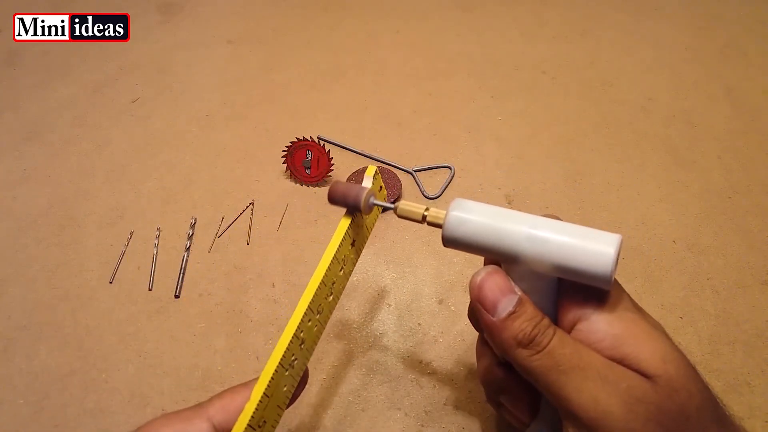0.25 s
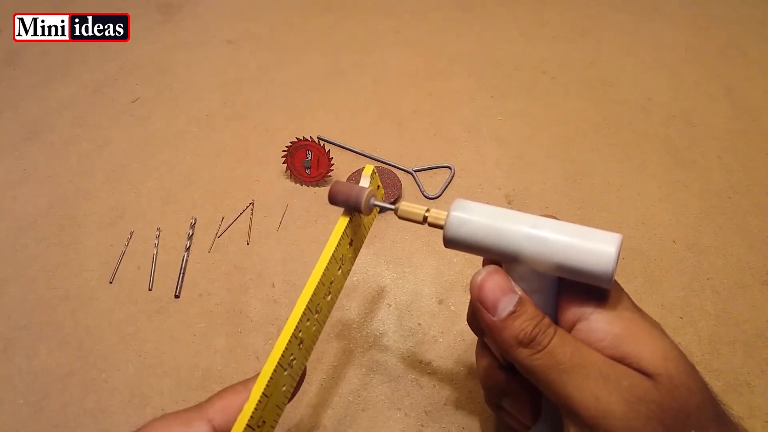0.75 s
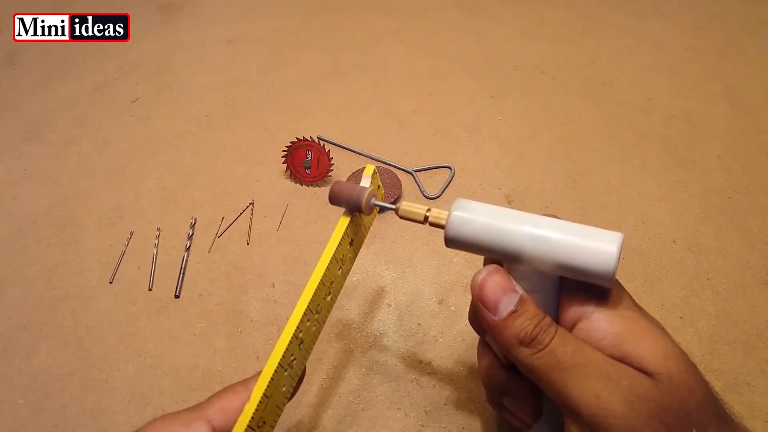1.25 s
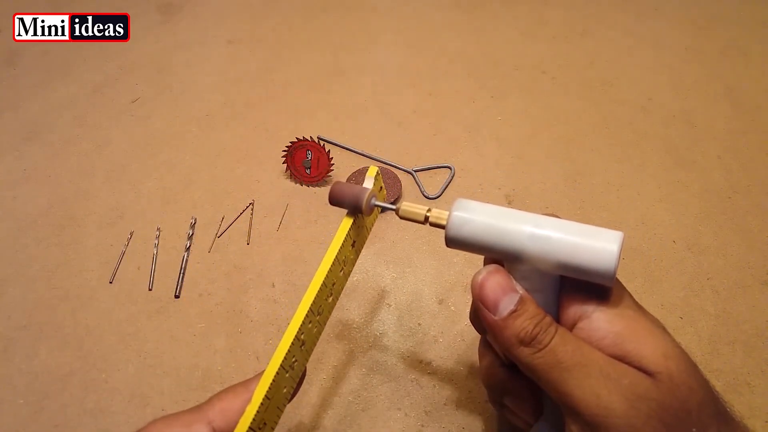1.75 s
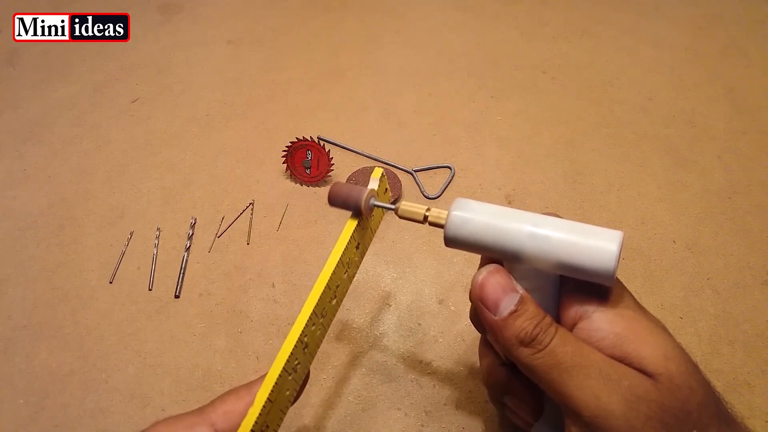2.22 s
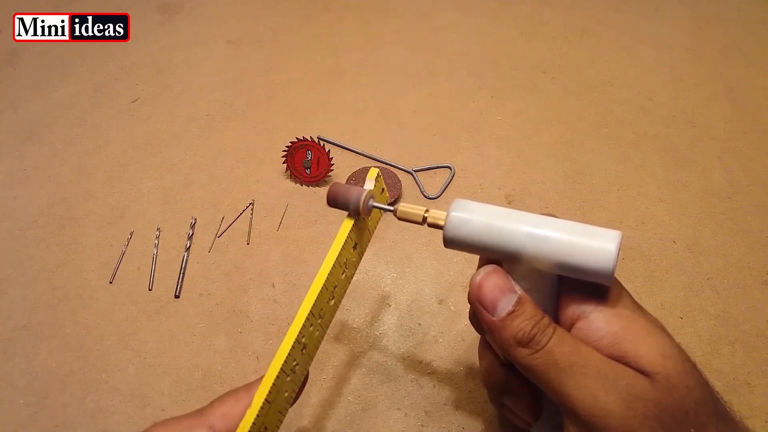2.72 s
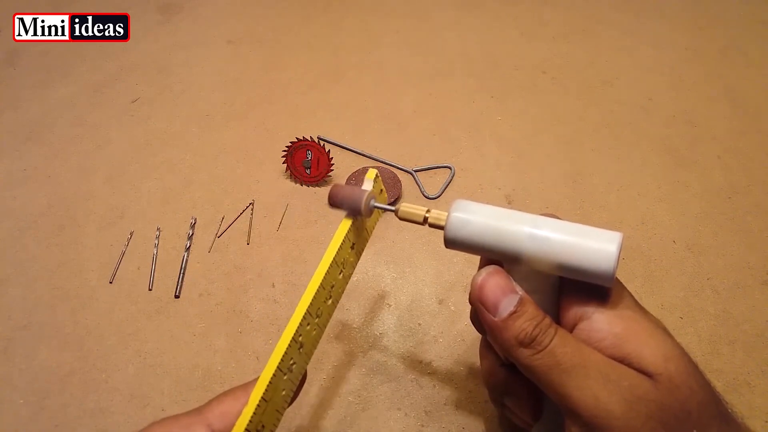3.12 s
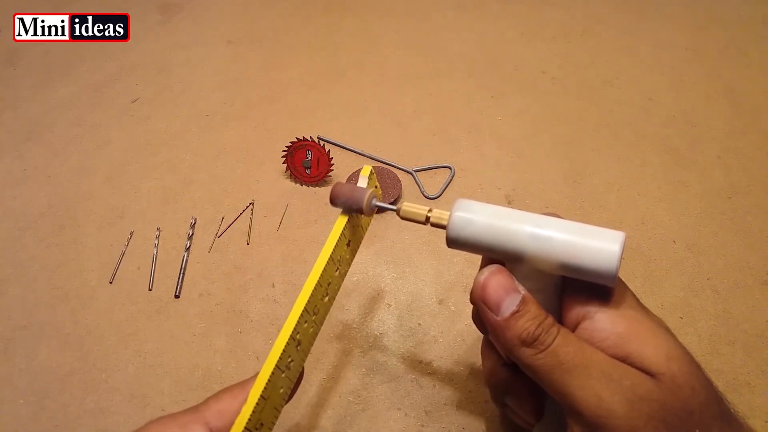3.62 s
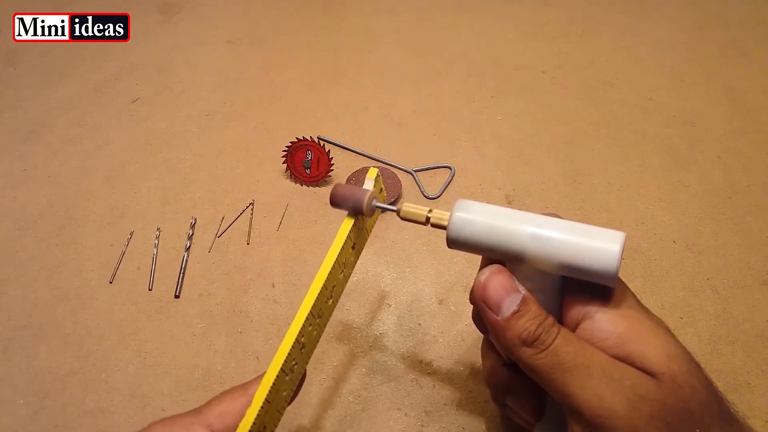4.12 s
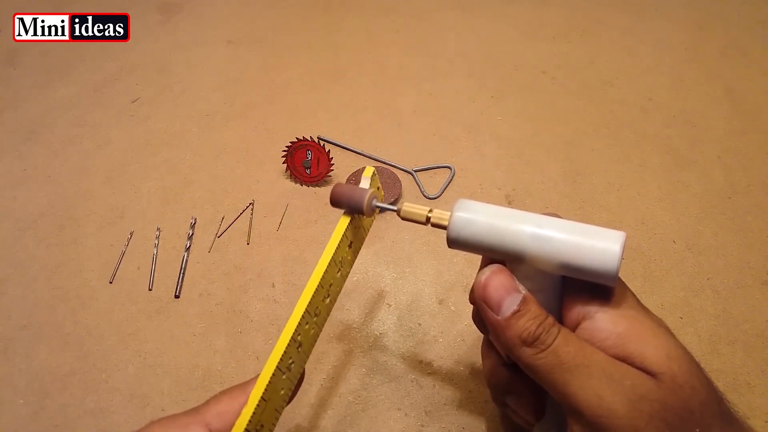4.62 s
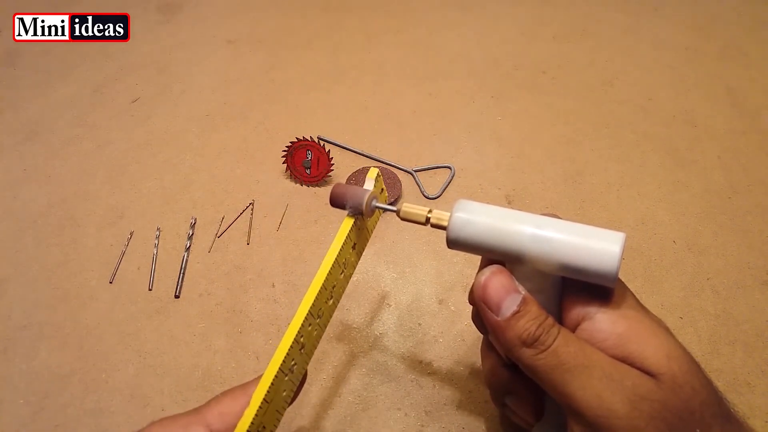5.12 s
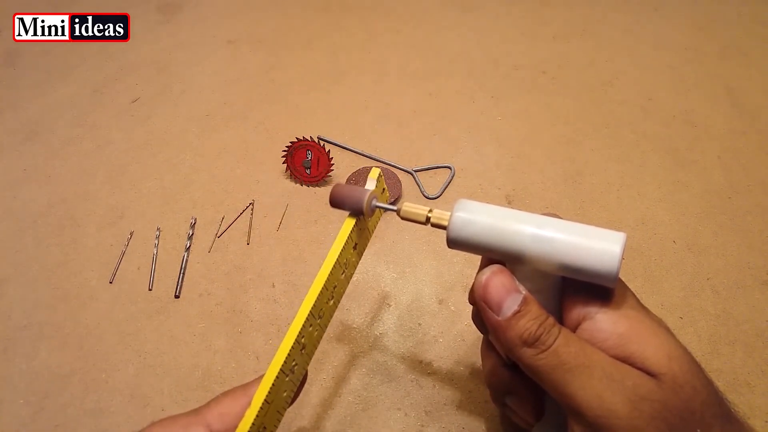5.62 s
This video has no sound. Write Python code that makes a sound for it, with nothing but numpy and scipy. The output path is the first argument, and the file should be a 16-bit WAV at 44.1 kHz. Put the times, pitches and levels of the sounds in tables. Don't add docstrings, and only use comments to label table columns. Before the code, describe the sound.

Close, buzzy sanding of a thin metal strip: a high whine sinks to a growl, recovers, stops for an instant, and grinds again.

```python
import sys
import numpy as np
from scipy import signal
from scipy.fft import rfft, irfft
from scipy.io import wavfile

SR = 44100
rng = np.random.default_rng(int(sys.argv[2]) if len(sys.argv) > 2 else 0)


def materialize(psi):
    bounded = np.clip(np.atleast_2d(psi).T, -1, 1)
    quanta = np.round(bounded * 32767).astype(np.int16)
    wavfile.write(sys.argv[1], SR, quanta)


def magnitude_from_level(level_db):
    exponent = np.asarray(level_db, float) / 20
    return 10 ** exponent


N = 258426

# frequency in Hz, bandwidth in Hz, level in dB.
GRIP = (142, 28, -45)
USUAL_PUSH_DB = -37.5
SLIP_S = .00005


def rms_one(x):
    return x / np.sqrt(np.mean(x ** 2) + 1e-20)


def in_time(rows):
    s, *columns = np.transpose(rows)
    return [np.interp(np.arange(N) / SR, s, c) for c in columns]


def resonate(x, modes, between_db):
    out = magnitude_from_level(between_db) * x
    for k, (hz, width_hz, db) in enumerate(modes):
        r = np.exp(-np.pi * width_hz / SR)
        b = (1 - r * r) / 2 * np.array([1, 0, -1])
        poles = [1, -2 * r * np.cos(2 * np.pi * hz / SR), r * r]
        out = out + (-1) ** k * magnitude_from_level(db) * signal.lfilter(b, poles, x)
    return out


def cut(x, hz, kind, order=2):
    return signal.sosfilt(signal.butter(order, hz, kind, fs=SR, output="sos"), x)


def grit(per_s, rough, touch_db, slip_s, count, echo=0, seam=0):
    turns = np.cumsum(per_s) / SR
    whole = np.arange(int(turns[-1]))
    angle = (np.arange(count) + rng.random(count)) / (2 * count)
    angle = np.concatenate([angle, angle + .5])
    wear, fresh, slip = rng.standard_normal((3, len(whole), 2 * count))
    share = np.clip(np.interp(whole, turns, rough), 0, 1)[:, None]
    renew = .24 + .8 * share ** 1.5
    pattern = wear.copy()
    for k in whole[1:]:
        pattern[k] = np.sqrt(1 - renew[k] ** 2) * pattern[k - 1] + renew[k] * wear[k]
    pattern[:, :1] += seam * (1 - share) * magnitude_from_level(2 * fresh[:, 1:2])
    bite = np.sqrt(1 - share ** 2) * pattern + share * fresh
    bite[:, count:] = np.sqrt(1 - echo ** 2) * bite[:, count:] - echo * bite[:, :count]
    bite = bite * magnitude_from_level(touch_db * np.cos(2 * np.pi * angle))
    bite = bite / np.sqrt(np.mean(bite ** 2, axis=1, keepdims=True))
    at = np.interp(whole[:, None] + angle, turns, np.arange(N))
    slip = slip_s * SR * (.08 + 1.3 * share) * slip
    at = np.clip(at + slip, 0, N - 1)
    fine = 4
    clicks = np.bincount((at * fine).astype(int).ravel(), bite.ravel(), N * fine)
    return rms_one(signal.resample_poly(clicks, 1, fine) / np.sqrt(per_s))


def roughness():
    # start in seconds, end in seconds, roughness from 0 to 1.
    skip_rows = [(0, .36, .9), (.4, .54, .55), (.56, .63, .45), (.75, .75, .6), (.8, 1.35, .2),
                 (3.62, 4.03, .27), (4.3, 4.56, .22), (.89, .89, .6), (1.53, 1.54, .5), (1.645, 1.665, .6),
                 (1.71, 1.71, .5), (1.83, 1.89, .55), (1.89, 2.06, .75), (2.06, 2.27, .9), (2.3, 2.31, .5),
                 (2.44, 2.45, .7), (2.5, 2.62, .5), (2.67, 3.19, .9), (3.26, 3.32, .43), (3.36, 3.41, .78),
                 (3.58, 3.58, .6), (3.72, 3.77, .47), (3.91, 3.96, .52), (4.13, 4.27, .36),
                 (4.39, 4.45, .52), (4.59, 4.61, .5), (4.73, 4.83, .5), (4.89, 5.14, .75),
                 (5.14, 5.26, .55), (5.37, 5.38, .4), (5.455, 5.465, .6), (5.49, 5.5, .4), (5.6, 5.61, .4),
                 (5.69, 5.71, .5), (5.78, 5.79, .4)]
    steady_rough, settle_per_s = .11, 11
    t = np.arange(N) / SR
    skips = [top - settle_per_s * np.maximum(0, np.maximum(a - t, t - b)) for a, b, top in skip_rows]
    return np.maximum(steady_rough, np.max(skips, axis=0))


def room_tone():
    # frequency in Hz, level in dB.
    air_spectrum = [(40, -10), (64, -16), (230, -3), (700, -10), (1150, -12), (2570, -21), (16000, -29)]
    air_hz, air_db = np.transpose(air_spectrum)
    hz = np.maximum(np.fft.rfftfreq(N, 1 / SR), 1)
    shape = magnitude_from_level(np.interp(np.log(hz), np.log(air_hz), air_db))
    return magnitude_from_level(-64) * rms_one(irfft(rfft(rng.standard_normal(N)) * shape, N))


def hopping(speed):
    # time in seconds, level in dB.
    hop_levels = [
        (0.0, -24),
        (0.02, -22.5),
        (0.03, -32),
        (0.044, -25),
        (0.204, -23.5),
        (0.26, -28.5),
    ]
    hop_db, = in_time(hop_levels + [(.29, -25.5), (.4, -120)])
    turns = np.cumsum(speed) / SR
    hops = grit(speed / 5, np.full(N, .16), touch_db=3.0, slip_s=.00012, count=10, echo=.9, seam=2)
    hops = hops * magnitude_from_level(5.7 * np.cos(2 * np.pi * (turns * 2 / 5 - .95)))
    hops = cut(hops, 880, "high", order=4)
    hops = magnitude_from_level(hop_db - 4.5) * (hops + magnitude_from_level(2.5) * cut(hops, 2220, "high"))
    beat = magnitude_from_level(hop_db - 23.0) * np.sin(2 * np.pi * turns * 3 / 5)
    beat = beat + magnitude_from_level(hop_db - 8.5) * np.sin(2 * np.pi * turns * 13 / 5)
    return hops, beat


def knocks(speed, rough, knock_db, bright_db):
    # frequency in Hz, bandwidth in Hz, level in dB.
    body_modes = [(690, 280, -24), (1102, 177, 2.5), (1592, 210, -1.5), (1882, 183, 1.5), (2330, 337, -5.5),
                  (2906, 88, -1.5), (3216, 121, -3.5), (3323, 97, -1.5), (3520, 110, -6), (4116, 225, -0.5),
                  (5000, 48, -10)]
    hops, beat = hopping(speed)
    biting = np.clip((np.arange(N) / SR - .2) / 0.045, .2, 1)
    bites = grit(speed, rough, touch_db=2.0, slip_s=SLIP_S, count=14, seam=-6)
    bites = rule_ends(biting * magnitude_from_level(knock_db) * bites)
    upper = cut(bites, 1740, "high")
    blows = hops + ticks() + bites + (magnitude_from_level(bright_db) - 1) * upper
    shaken = cut(resonate(blows, body_modes, between_db=-14.5), 402, "high")
    return magnitude_from_level(10.5) * cut(shaken, 5660, "low", order=4) + beat


def rasp(speed, rough, rasp_db):
    # frequency in Hz, bandwidth in Hz, level in dB.
    high_modes = [(4630, 32, -16), (5500, 60, 2.5), (5923, 99, -2), (6330, 83, 7), (7700, 110, -17.5),
                  (8080, 200, 4), (8340, 130, -4), (8950, 46, 6), (8900, 80, 2), (9350, 59, 4),
                  (9570, 68, -5.5), (10350, 50, 4.5),
                  (10280, 95, 3.5), (10700, 230, 5), (10960, 40, -5.5), (10940, 100, 4),
                    (11800, 170, -8.5), (12230, 480, 1), (13100, 90, -2), (13900, 170, -11),
                    (14500, 130, -10), (14800, 57, -9.5), (15400, 110, -12)]
    dust = grit(speed, rough ** .5, touch_db=2.0, slip_s=SLIP_S / 4, count=70)
    hop_share = np.clip((.26 - np.arange(N) / SR) / 0.021, 0, 1)
    landing = np.cos(2 * np.pi * (np.cumsum(speed) / SR * 2 / 5 - .97))
    dust = dust * magnitude_from_level(6.0 * hop_share * landing)
    ringing = resonate(dust, high_modes, between_db=-7.0)
    ringing = cut(ringing, 3250, "high", order=4)
    top_db = 5.5 * np.log2(np.clip(speed, 50, 130) / 130)
    ringing = ringing + (magnitude_from_level(top_db) - 1) * cut(ringing, 14000, "high")
    scrape = cut(cut(dust, 1600, "low"), 240, "high", order=1)
    return magnitude_from_level(rasp_db) * (rms_one(ringing) + magnitude_from_level(0.5) * rough * scrape)


def hum(speed, rough, knock_db, power_db):
    # level in dB, slope in dB per octave of speed, lower and upper limit in turns per second.
    order_tones = [
        (-48.5, 9, 207, 520),
        (-48.5, 3.5, 72, 520),
        (-54.5, 29, 440, 500),
    ]
    # frequency in Hz, gain in dB.
    casing_path = [(108, -15.5), (146, -3), (200, -16.5), (300, -18), (420, -4), (580, -9), (1000, -13),
                   (1500, 4)]
    # time in seconds, level in dB.
    grasp_levels = [(0, 1), (.9, -3.5), (1.2, -6.5), (1.3, 3.5), (1.7, -1), (2.0, -3.5), (2.5, 0),
                    (3.1, 0.5), (3.22, 2), (3.4, 6), (3.5, -8), (3.7, 2), (4.2, -0.5), (4.6, 1), (5.1, 3),
                    (5.33, -5), (5.4, 4.5), (5.65, 4.5), (5.72, 0), (5.8, -6)]
    phase = 2 * np.pi * np.cumsum(speed) / SR
    path_hz, path_db = np.transpose(casing_path)
    load_db = 0.16 * (knock_db - power_db - USUAL_PUSH_DB) + 0.2 * power_db
    load_db = load_db - 8 * rough * (speed < 250)
    levels_db = []
    for k, (db, per_octave, low, high) in enumerate(order_tones):
        speed_db = per_octave * np.log2(np.clip(speed, low, high) / low)
        casing_db = np.interp(np.log((k + 1) * speed), np.log(path_hz), path_db)
        levels_db.append(db + speed_db + load_db + casing_db)
    levels_db.append(load_db - 53.0 + 0.27 * power_db)
    grasp_db, = in_time(grasp_levels)
    levels_db[0] = levels_db[0] + grasp_db
    tones = sum(magnitude_from_level(db) * np.sin((k + 1) * phase + k) for k, db in enumerate(levels_db))
    flutter = rms_one(cut(rng.standard_normal(N), 16.0, "low"))
    tones = tones * magnitude_from_level((2.5 + 0.69 * rough) * flutter * (speed < 260))
    hz, width_hz, db = GRIP
    thrum = rms_one(resonate(rng.standard_normal(N), [(hz, width_hz, 0)], between_db=-120))
    thrum_db = db + grasp_db + 0.62 * knock_db + 9.5 * rough - 13 * (speed > 240)
    return np.sqrt(2) * tones + magnitude_from_level(thrum_db) * thrum


def room(x):
    t60_s, first_echo_s = 0.056, 0.0026
    t = np.arange(SR // 8) / SR
    onset = np.clip(t / first_echo_s - .5, 0, 1)
    echoes = rng.standard_normal(len(t)) * magnitude_from_level(-60 * t / t60_s) * onset
    return x + magnitude_from_level(-12) * signal.fftconvolve(x, echoes / np.sqrt(np.sum(echoes ** 2)))[:N]


def whine(speed):
    # time in seconds, third order level in dB, fifth order level in dB.
    pole_levels = [
        (.27, -68, -73),
        (.33, -42, -60),
        (.38, -42, -40),
        (.45, -36, -40),
        (.5, -43.5, -42),
        (.6, -40.5, -69),
        (.7, -71.5, -70.5),
    ]
    phase = 2 * np.pi * np.cumsum(speed) / SR
    third_db, fifth_db = in_time(pole_levels)
    third = magnitude_from_level(third_db) * np.sin(3 * phase + 2)
    return np.sqrt(2) * (third + magnitude_from_level(fifth_db) * np.sin(5 * phase))


def thud(speed, rough, knock_db):
    # time in seconds, level beside the push in dB.
    flatness = [(.3, -8), (.6, 3.5), (.9, -5), (1.2, 5), (1.5, 4.5), (1.65, 6), (1.8, 12), (2.0, 7),
                (2.25, -11), (2.37, -5), (2.6, 4), (3.3, -9), (3.8, 1.5), (4.2, -1), (4.6, -2.5), (5.0, 10),
                (5.5, -13), (5.86, 3)]
    flat_db, = in_time(flatness)
    blows = grit(speed, rough, touch_db=0, slip_s=SLIP_S, count=3, seam=2.5)
    blows = cut(cut(blows, 382, "high", order=4), 980, "low", order=4)
    started = np.clip((np.arange(N) / SR - .27) / .05, 0, 1)
    return started * magnitude_from_level(knock_db + flat_db - 2.0) * blows


def ticks():
    # time in seconds, peak level in dB.
    catches = [(0.284, -20), (0.6679, -17.5), (2.1086, -22), (2.1878, -16), (2.2308, -18), (2.2505, -12),
               (2.2774, -16), (2.297, -18), (2.461, -20), (3.019, -32), (3.041, -36), (3.1914, -17),
               (3.2316, -16), (3.3297, -11.5), (3.4506, -15), (3.5745, -14), (3.6531, -18), (4.1192, -14.5),
               (4.2956, -21), (4.3331, -18), (5.214, -19), (5.2365, -21), (5.2442, -27)]
    t = np.arange(SR // 200) / SR
    bursts = rng.standard_normal((len(catches), len(t))) * np.exp(-t / 0.001)
    out = np.zeros(N)
    for (s, db), burst in zip(catches, bursts):
        out[int(s * SR):int(s * SR) + len(t)] += magnitude_from_level(db - 7.0) * burst
    return out


def sing(x, rows):
    q, block = 7, 256
    hz, db = in_time(rows)
    out, state = np.zeros(N), np.zeros(2)
    for i in range(0, N, block):
        r = np.exp(-np.pi * hz[i] / q / SR)
        poles = [1, -2 * r * np.cos(2 * np.pi * hz[i] / SR), r * r]
        drive = (1 - r * r) / 2 * x[i:i + block]
        out[i:i + block], state = signal.lfilter([1], poles, drive, zi=state)
    return magnitude_from_level(db) * (out - np.roll(out, 2))


def rule_ends(bites):
    # time in seconds, frequency in Hz, level in dB.
    free_end = [
        [(.3, 1200, -16), (.45, 1600, -1), (.6, 2260, -14.5), (.72, 2370, -6), (.9, 1700, 0), (1.2, 1670, 0),
         (1.53, 1580, 7), (1.6, 1400, 2), (1.85, 1350, 4)],
        [(2.05, 1130, -10), (2.2, 1120, -1), (2.33, 1100, 0.5), (2.4, 1340, 5), (2.45, 1620, 6.5),
         (2.55, 1540, 4), (2.85, 1520, -17)],
        [(3.02, 1640, -3), (3.2, 1780, 2), (3.4, 1790, -2), (3.44, 1100, -19), (3.56, 1130, -8),
         (3.62, 1750, -2), (3.9, 1750, 0.5), (4.4, 1770, -2), (4.75, 1595, -4)],
        [(5.05, 1070, -26), (5.28, 1110, -2.5), (5.4, 1500, 0), (5.58, 1400, -9), (5.62, 1880, 2),
         (5.7, 1360, -6), (5.86, 1580, -1)],
    ]
    # time in seconds, frequency in Hz, level in dB.
    short_end = [(.3, 3400, -3), (.65, 3340, -8), (.8, 2270, -2), (.9, 3360, -3), (1.1, 2370, -3),
                 (1.3, 3340, -11), (1.57, 2310, -4), (1.8, 2350, 2), (2.05, 2370, -7), (2.26, 3300, -9),
                 (2.39, 2830, 4), (2.5, 3300, -19), (3.3, 4020, -3), (3.53, 2840, 0.5), (3.7, 3280, -10),
                 (3.96, 3300, 0), (4.07, 2510, -24), (4.16, 3400, 2), (4.38, 3350, -11), (4.67, 2460, -12),
                 (5.0, 3300, -32), (5.4, 2880, -9), (5.53, 3160, -1), (5.63, 2800, -4), (5.86, 3230, -16)]
    return bites + sing(bites, sum(free_end, [])) + sing(bites, short_end)


def digs():
    # start in seconds, end in seconds, extra push in dB.
    dig_rows = [(0.67, 0.696, 1.5), (0.868, 0.906, 0.25), (1.07, 1.17, 0.5), (1.252, 1.289, 1),
                (1.373, 1.416, 0.96), (1.487, 1.528, 0.9), (1.552, 1.596, 0.86), (2.175, 2.197, 2.05),
                (2.23, 2.297, 1.85), (2.445, 2.486, 1), (3.061, 3.54, 1.9), (3.19, 3.254, 1.5),
                (3.33, 3.335, 1.5), (3.517, 3.537, 0.5), (3.657, 3.752, 3.5), (3.8, 3.888, 1.6),
                (3.915, 3.98, 3), (4.12, 4.163, 2.5), (4.29, 4.3, 1.8), (4.336, 4.405, 3.5),
                (4.46, 4.552, 1.3), (4.574, 4.72, 1.25), (5.215, 5.244, 0.8), (5.45, 5.465, 0.5),
                (5.51, 5.566, 0.6), (5.6, 5.683, 0.73)]
    rise_s, release_s = 0.0047, 0.033
    t = np.arange(N) / SR
    return sum(db * np.interp(t, [a - rise_s, a, b, b + release_s], [0, 1, 1, 0]) for a, b, db in dig_rows)


def shoves():
    # start in seconds, firmest in seconds, end in seconds, sag in turns per second.
    shove_rows = [(.723, .758, .817, 13), (.817, .93, 1.138, 7.6), (1.138, 1.27, 1.376, 15.5),
                  (1.376, 1.445, 1.507, 13.5), (1.507, 1.559, 1.619, 10.6), (1.619, 1.669, 1.76, 13),
                  (3.542, 3.586, 3.65, 16), (3.62, 3.692, 3.78, 25), (3.73, 3.804, 3.864, 18.5),
                  (3.864, 3.965, 4.12, 23), (4.09, 4.155, 4.284, 22.5), (4.284, 4.36, 4.5, 13.6),
                  (4.44, 4.53, 4.645, 22)]
    t = np.arange(N) / SR
    out = np.zeros(N)
    for a, firmest, b, sag in shove_rows:
        out += sag * np.sin(np.pi / 2 * np.interp(t, [a, firmest, b], [0, 1, 0]))
    return out


def scene():
    # time in seconds, speed in turns per second.
    shaft_speed = [
        [(0, 508), (.25, 507), (.29, 455)],
        [(.346, 392), (.56, 260), (.817, 211.4), (1.138, 194.3), (1.376, 176.1), (1.619, 150.8), (1.82, 120),
         (1.936, 66.7), (2.0, 60.5)],
        [(2.063, 69.7), (2.112, 100), (2.164, 169), (2.289, 233.3), (2.36, 214), (2.4, 199), (2.457, 153.6),
         (2.497, 147), (2.583, 111), (2.855, 47)],
        [(2.98, 51), (3.059, 132), (3.169, 171), (3.515, 192), (3.864, 175.5), (4.284, 166.2), (4.685, 152),
         (4.747, 126.6), (4.989, 54)],
        [(5.144, 69.5), (5.194, 89), (5.302, 131), (5.381, 148.1), (5.584, 144.2), (5.702, 127.3), (5.74, 138),
         (5.86, 145.5)],
    ]
    # time in seconds, push in dB, brightness in dB.
    contact = [
        [(0, -19, -22), (.08, -18, -26), (.1, -27, -11), (.22, -30, -8), (.245, -31, 6)],
        [(.3, -26.5, 5.5), (.45, -28, 7.5), (.57, -27.5, 7.5), (.65, -29, 8), (.76, -31, 8.5),
         (1.04, -27.5, 5.5), (1.45, -30, 3), (1.62, -30.5, 4), (1.88, -35.5, 2), (1.95, -43, 6),
         (2.03, -38, 3.5)],
        [(2.12, -31, 0.5), (2.22, -30.5, 0.5), (2.4, -28.5, 0.5), (2.47, -29, 2.5), (2.55, -34, 2.5),
         (2.7, -33.5, 2.5), (2.8, -43, 3.5)],
        [(3.06, -42, -7.5), (3.15, -44.5, -4), (3.2, -37.5, -3), (3.28, -36, -4.5), (3.58, -36, -2),
         (3.64, -35, -3.5), (4.07, -35, -1), (4.25, -35, -2.5), (4.5, -34, -1), (4.76, -34, -3),
         (4.8, -38, 0.5), (4.99, -44.5, 0)],
        [(5.04, -45.5, -3.5), (5.12, -42, -0.5), (5.24, -35.5, -1.5), (5.39, -39, 5.5), (5.64, -35.5, 2),
         (5.73, -36.5, -2.5), (5.86, -34, -0.5)],
    ]
    # time in seconds, power in dB.
    motor_power = [
        (2.815, -4.5),
        (2.83, -11),
        (2.856, -28),
        (2.9, -44),
        (2.994, -44),
        (2.999, -13),
        (3.045, -0.5),
        (3.06, 0),
    ]
    speed = in_time(sum(shaft_speed, []))[0] - shoves()
    dig_db = digs()
    unsteady = rms_one(cut(rng.standard_normal(N), 25, "low"))
    speed = speed * (1 + .004 * unsteady * (speed < 500))
    push_db, bright_db = in_time(sum(contact, []))
    power_db, = in_time(motor_power)
    knock_db = push_db + dig_db + power_db
    rasp_db = -34.5 + 0.35 * (push_db - USUAL_PUSH_DB) + 0.47 * bright_db + power_db
    rasp_db = rasp_db - 0.9 * np.arange(N) / SR
    rasp_db = rasp_db + 0.91 * np.log2(np.clip(speed, 120, 330) / GRIP[0])
    rasp_db = rasp_db + 0.68 * dig_db
    bright_db = bright_db + 1.83 * dig_db
    rough = roughness()
    contact_sound = knocks(speed, rough, knock_db, bright_db) + rasp(speed, rough, rasp_db)
    drill = room(contact_sound) + whine(speed)
    mono = drill + hum(speed, rough, knock_db, power_db) + room_tone() + thud(speed, rough, knock_db)
    return np.array([mono, mono])


def band_limit(x):
    return signal.sosfilt(signal.butter(12, 16580, fs=SR, output="sos"), x)


def record(dry):
    trimmed = cut(dry, 110, "high")
    trimmed = signal.sosfilt(signal.ellip(12, .5, 70, 15760, fs=SR, output="sos"), trimmed)
    return band_limit(trimmed - .0007)


dry = scene()
out = record(dry)
materialize(out)
```